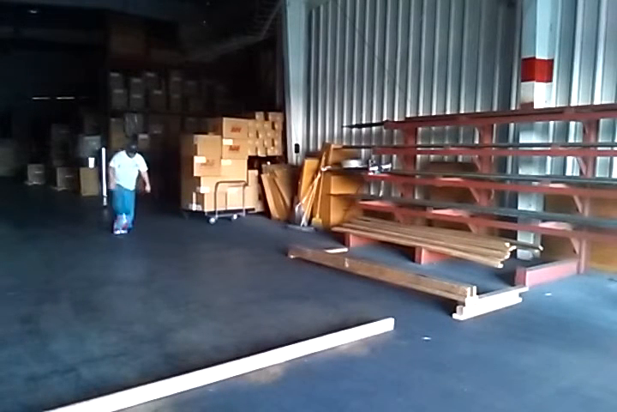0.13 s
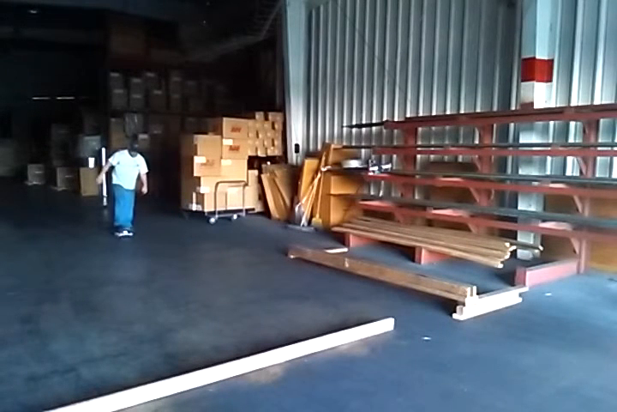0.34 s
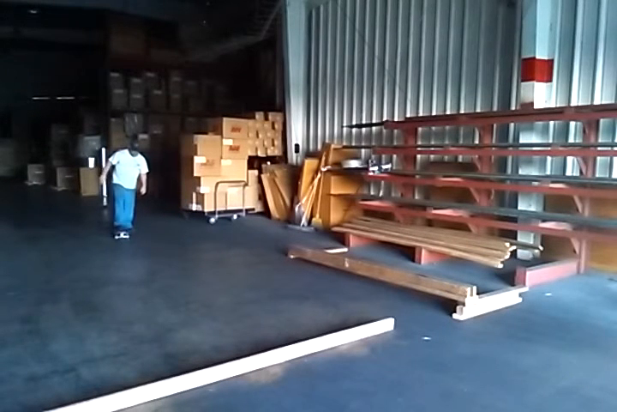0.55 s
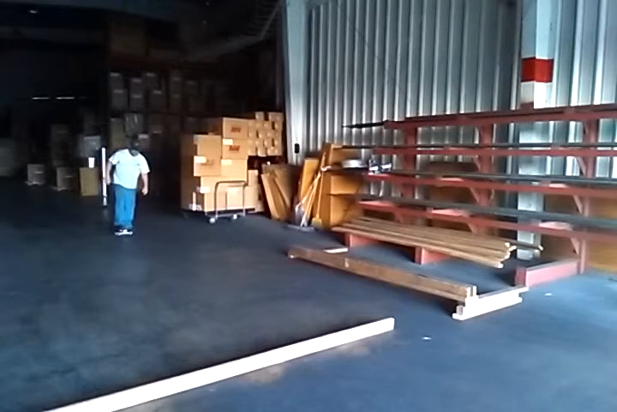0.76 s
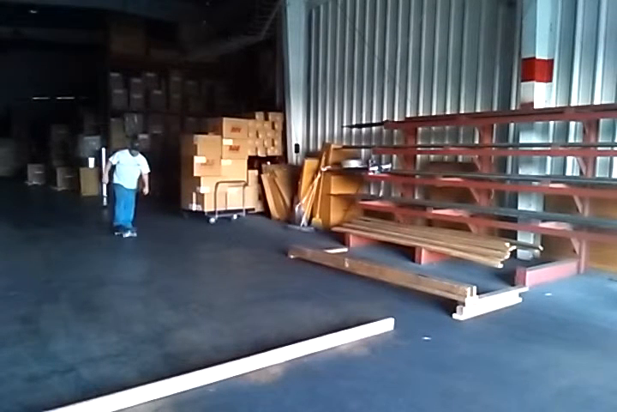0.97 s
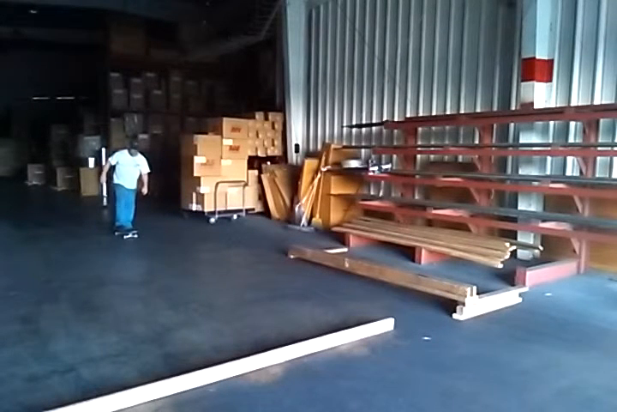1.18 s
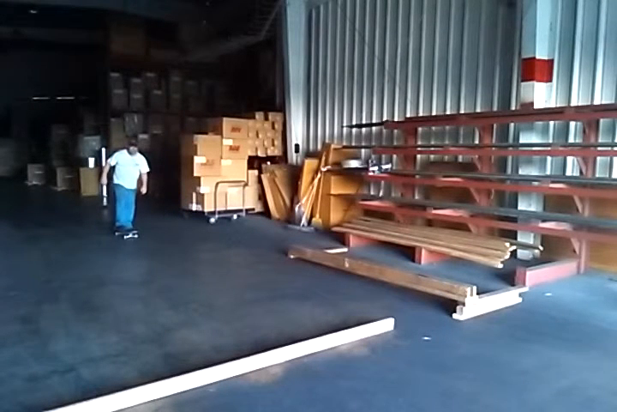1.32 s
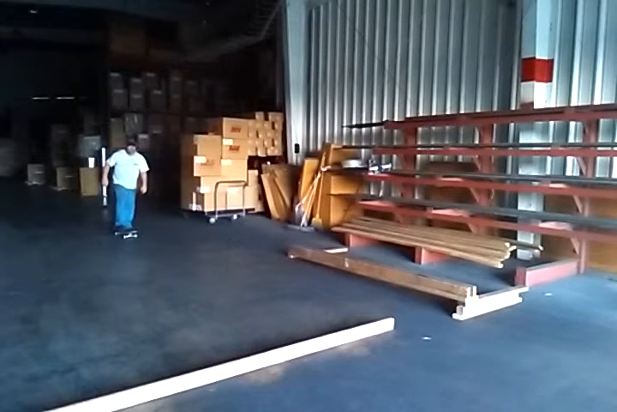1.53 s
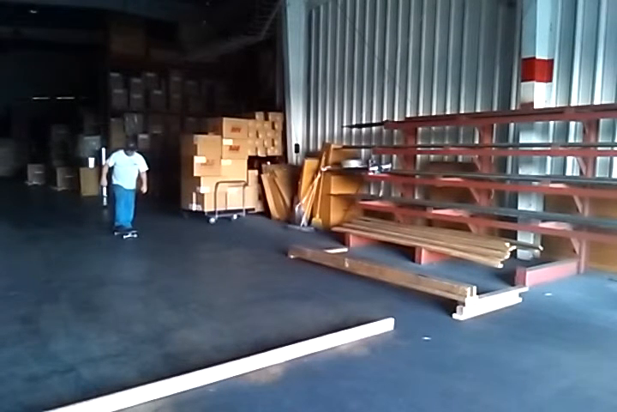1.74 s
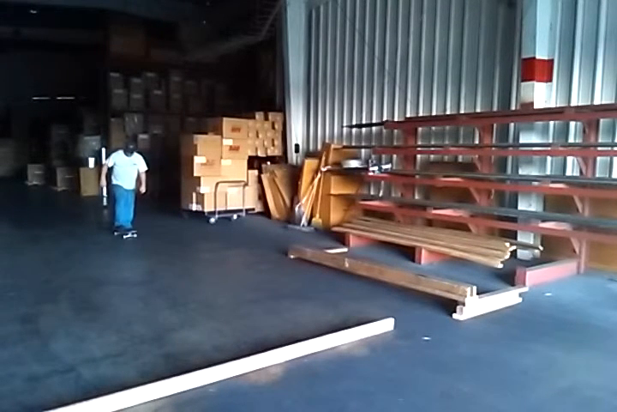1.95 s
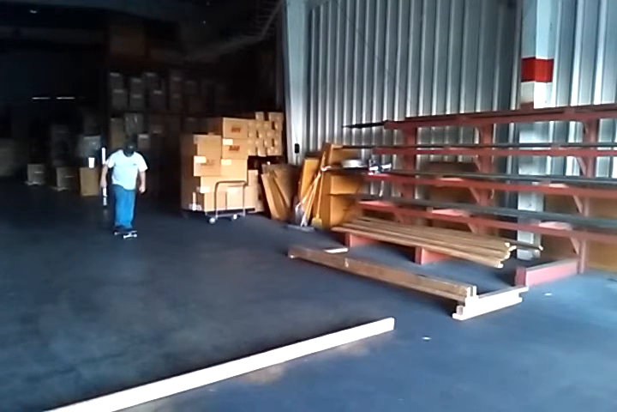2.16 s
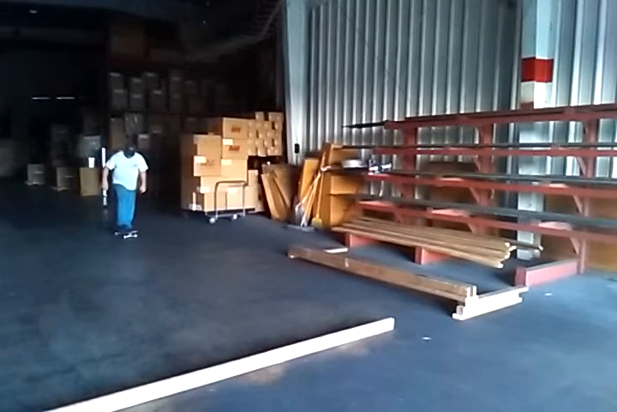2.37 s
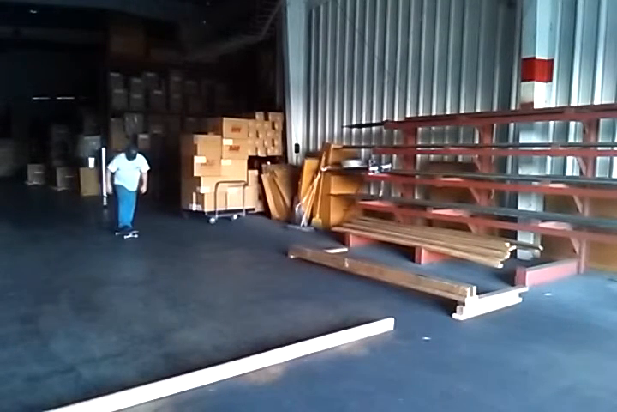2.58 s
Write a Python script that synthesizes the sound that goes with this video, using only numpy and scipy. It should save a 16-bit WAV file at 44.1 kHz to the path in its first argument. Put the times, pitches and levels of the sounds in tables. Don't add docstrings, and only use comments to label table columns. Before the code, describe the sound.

Hard skateboard clacks on a concrete floor come first, loud and close together, followed by weaker taps and barely audible rolling wheels; a large empty hall adds a long tail, with low air rumble and faint hiss.

```python
import sys
import numpy as np
from scipy import signal
from scipy.fft import rfft, irfft
from scipy.io import wavfile
from scipy.ndimage import uniform_filter1d

SR = 44100
rng = np.random.default_rng(int(sys.argv[2]) if len(sys.argv) > 2 else 0)


def transcribe(signal):
    frames = np.atleast_2d(signal).T
    limited = np.clip(frames, -1, 1)
    pcm = np.round(limited * 32767).astype(np.int16)
    wavfile.write(sys.argv[1], SR, pcm)


def ratio(d):
    e = np.asarray(d, float) / 20
    return 10 ** e


N = 114660


def evened(x):
    return x / np.sqrt(np.mean(x ** 2) + 1e-20)


def read(points, hz):
    f, value = np.transpose(points)
    return np.interp(np.log(hz + 1), np.log(f + 1), value)


def level(curve):
    s, db = np.transpose(curve)
    return ratio(uniform_filter1d(np.interp(np.arange(N) / SR, s, db), size=400))


def resonate(x, body):
    out = 0
    for hz, width, db in body:
        r = np.exp(-np.pi * width / SR)
        a = [1, -2 * r * np.cos(2 * np.pi * hz / SR), r * r]
        b = [(1 - r * r) / 2, 0, -(1 - r * r) / 2]
        once = signal.lfilter(b, a, x)
        out = out + ratio(db) * signal.lfilter(b, a, once)
    return out


def noise(field_db, count, patchy_db, size=512):
    frames, hz = count * 4 // size + 6, np.fft.rfftfreq(size, 1 / SR)
    s = np.arange(frames) * size / 4 / SR
    a, b, patches = rng.standard_normal((frames, len(hz), 3)).T
    patches = uniform_filter1d(patches, size=6, axis=0)
    patches = evened(uniform_filter1d(patches, size=8, axis=1))
    z = (a + 1j * b) * ratio(field_db(hz[:, None], s) + patchy_db * patches)
    return signal.istft(z, nperseg=size, noverlap=size * 3 // 4)[1][:count]


# (time [s], level [dB], hall send [dB])
TICKS = [(-.3, -27, -31), (0.2105, -12.5, -35.5), (0.215, -18, -41.5), (0.318, -6.5, -42.5),
         (0.3196, -10.5, -30.5), (.5325, -15, -34), (1.0614, -16, -32.5), (1.2003, -22.5, -38.5),
         (1.478, -47.5, -42), (1.4884, -40, -29), (2.254, -38, -35)]
# (time [s], level [dB], centre [Hz], width [octaves], hall send [dB])
KNOCKS = [(.2096, -14.5, 945, 1.17, -23.5), (.2110, -21, 410, .25, -17.5), (0.2137, -11.5, 1300, 0.23, -22),
          (.3190, -19.5, 760, .5, -21), (0.3219, -7.5, 1140, 0.46, -21), (.3430, -16, 693, 1.03, -14.5),
          (0.5341, -25, 1050, 1.08, -17), (0.557, -26, 498, 0.14, -14.5), (1.0635, -22.5, 850, 0.45, -17.5),
          (1.0850, -25.5, 583, 1.26, -9.5), (1.4790, -45, 1070, 0.22, -18.5),
          (1.5180, -44.5, 1800, 0.75, -21.5), (2.2540, -45.5, 1137, 0.97, -21.5),
          (2.2560, -48.5, 1650, 0.48, -12.5)]
# (delay [s], level [dB])
NEAR_ECHOES = [(.0024, -13.5), (.0052, -16), (.0085, -11.5), (0.012, -9.5)]


def board():
    near = np.zeros(1000)
    near[0] = 1
    for s, db in NEAR_ECHOES:
        near[round(s * SR)] = ratio(db)

    luck = rng.standard_normal((len(KNOCKS), len(DECK_MODES)))
    blows = [(s, *tick(*row)) for s, *row in TICKS]
    blows += [(s, *knock(*row, k)) for (s, *row), k in zip(KNOCKS, luck)]

    out = np.zeros(N + 3 * SR)
    for s, direct, tail in blows:
        start = SR + round(s * SR)
        for part in signal.fftconvolve(direct, near), tail:
            out[start:][:len(part)] += part
    return out[SR:SR + N]


# (frequency [Hz], level [dB])
TICK_COLOUR = [(500, -10.5), (2300, -11), (3200, -5), (3900, -11.5), (6000, -6.5), (7600, -2.5), (9000, -4),
               (11300, 3.5), (14000, -10.5)]
TICK_T60_S, TICK_RING_T60_S, TICK_RING_DB = 0.0016, 0.0067, -12.5
TICK_FLOOR_HZ, DIRECT_TILT_DB_PER_OCT = 1800, -1


def tick(db, send_db):
    t = np.arange(3000) / SR
    tilted = lambda hz, s: read(TICK_COLOUR, hz) + DIRECT_TILT_DB_PER_OCT * np.log2(hz + 1) + 0 * s
    grit = noise(tilted, len(t), 0)
    decay = ratio(-60 * t / TICK_T60_S) + ratio(TICK_RING_DB - 60 * t / TICK_RING_T60_S)
    crack = grit * decay * np.minimum(t / 0.00041, 1)
    crack = signal.lfilter(*signal.butter(2, TICK_FLOOR_HZ, "high", fs=SR), crack)
    tail = hall(lambda hz: db + send_db + read(TICK_COLOUR, hz))
    return ratio(db) * crack / abs(crack).max(), tail


# (frequency [Hz], level [dB], decay by 60 dB [s])
DECK_MODES = [(293, -0.5, 0.043), (415, -8, .05), (482, -3, 0.11), (621, -6.5, 0.08), (735, -0.5, 0.039),
              (940, -6.5, 0.021), (1057.4, -1, 0.061), (1134, -2.5, 0.038), (1310, -3, 0.022),
              (1470, -9, 0.038), (1603, -5.5, 0.045), (1937, -4, 0.042), (2254, -9.5, 0.038),
              (3010, -2.5, 0.036)]
SPREAD_DB = 1.2
SMEAR_HZ, SKIRT_HZ, SKIRT_DB = 27.3, 159.6, -9


def knock(level_db, bright_hz, octaves, send_db, luck):
    t = np.arange(6000) / SR
    hz, db, t60 = np.transpose(DECK_MODES)[:, :, None]
    db = db - 6 * (np.log2(hz / bright_hz) / octaves) ** 2 + SPREAD_DB * luck[:, None]
    modes = ratio(db - 60 * t / t60) * np.sin(2 * np.pi * hz * t + luck[::-1, None])
    deck = modes.sum(0) * np.minimum(t / 0.00047, 1)

    def spread(f):
        peak = 1 / (1 + ((f - hz.T) / SMEAR_HZ) ** 2)
        skirt = ratio(SKIRT_DB) / (1 + ((f - hz.T) / SKIRT_HZ) ** 2)
        return (ratio(2 * (db - db.max())).T * (peak + skirt)).sum(1)

    tail = hall(lambda f: level_db + send_db + 10 * np.log10(spread(f)))
    return ratio(level_db) * deck / abs(deck).max(), tail


# (frequency [Hz], decay by 60 dB [s])
HALL_T60 = [(150, 0.43), (400, 0.58), (1000, 0.73), (2000, 1.028), (4000, 1.053), (8000, 0.76),
            (13000, 0.54)]
# (frequency [Hz], level [dB])
HALL_COLOUR = [(150, -4), (400, -1), (1000, -8.5), (2200, -2), (2600, -5), (3300, -6), (4000, -5),
               (13000, -8.5)]
BASS_GAP_DB_PER_OCT = 3.5
WALL_S, WALL_RISE_S, HOLD_S, PATCHY_DB = 0.014, 0.0021, 0.054, 2.5


def hall(source_db):
    t = np.arange(65536) / SR

    def field_db(hz, s):
        gap = BASS_GAP_DB_PER_OCT * np.log2(np.clip(hz, 100, 1500) / 1500)
        gap = gap / (1 + np.exp((s - WALL_S) / WALL_RISE_S))
        decay = -60 * (np.hypot(s, HOLD_S) - HOLD_S) / read(HALL_T60, hz)
        return read(HALL_COLOUR, hz) + gap + decay

    tail = noise(field_db, len(t), PATCHY_DB)
    hz = np.fft.rfftfreq(len(t), 1 / SR)[:, None]
    tail = irfft(rfft(tail) * ratio(source_db(hz).ravel()))
    return tail * np.minimum(t / 0.0021, 1) * np.minimum((t[-1] - t) / 0.11, 1)


# (time [s], level [dB])
ROLL = [(0., -66), (.12, -74), (.2, -72), (.3, -62), (.8, -75), (1.05, -69), (1.7, -67.5), (2.0, -76.5),
        (2.3, -75.5), (2.6, -66.5)]
# (frequency [Hz], width [Hz], level [dB])
ROLL_BODY = [(470, 210, 2.5), (780, 150, 8), (1300, 300, 7), (2400, 2700, -0.5), (3200, 500, -15.5)]
GRIT_PER_S, GRIT_DB = 7500, 3.5


def rolling():
    hits = rng.standard_normal(N) * (rng.random(N) < GRIT_PER_S / SR)
    grit = hits * ratio(GRIT_DB * np.minimum(rng.exponential(1, N), 3))
    blur = rng.standard_normal(3000) * ratio(-60 * np.arange(3000) / SR / 0.12)
    distant = signal.fftconvolve(grit, blur)[:N]
    return level(ROLL) * evened(resonate(distant, ROLL_BODY))


def squeak():
    start_s, end_s, low_hz, high_hz = 0.14, 0.21, 2500, 3600
    u = np.clip((np.arange(N) / SR - start_s) / (end_s - start_s), 0, 1)
    turns = np.cumsum(low_hz + (high_hz - low_hz) * u) / SR
    rub = evened(uniform_filter1d(rng.standard_normal(N), round(0.002 * SR)))
    return ratio(-60) * u * (u < 1) * rub * np.sin(2 * np.pi * turns)


# (time [s], peak level [dB], pitch [Hz])
PUFFS = [(.048, -38.5, 59), (0.063, -35, 74), (.137, -39, 86), (0.523, -35, 69.4), (0.941, -37.5, 57.4),
         (1.038, -44, 110), (1.418, -41, 49.7), (1.54, -37.5, 58.4), (1.566, -47, 78)]


def puffs():
    s, db, hz = np.transpose(PUFFS)[:, :, None]
    u = np.pi * hz * (np.arange(N) / SR - s)
    return (ratio(db) * (1 - 2 * u ** 2) * np.exp(-u ** 2)).sum(0)


# (frequency [Hz], level [dB per Hz])
HISS_COLOUR = [(120, -11), (200, -10), (532, -19), (591, -15.5), (815, -16.5), (2020, -29.5), (2830, -27.5),
               (4330, -37.5), (14000, -30.5)]
# (frequency [Hz], level [dB per Hz])
DRAUGHT_COLOUR = [(8.8, -39.5), (15, -2), (64, -5), (80, -21), (130, -10.5), (184, -19.5), (300, -31.5),
                  (390, -58), (660, -120)]
# (time [s], level [dB])
DRAUGHT = [(0.0, -58), (0.06, -42.5), (0.1, -55), (0.13, -46.5), (0.29, -53), (0.39, -48), (0.47, -96),
           (0.52, -40.5), (0.59, -56.5), (0.71, -48), (0.79, -54), (0.96, -46), (0.99, -51.5), (1.3, -47.5),
           (1.33, -55), (1.4, -52.5), (2.19, -53.5), (2.6, -52)]
HISS_DB, LUMP_S, EVEN = -62, 0.047, 0.38


def air():
    hiss = evened(noise(lambda hz, s: read(HISS_COLOUR, hz) + 0 * s, N, 1.5))
    rumble = evened(noise(lambda hz, s: read(DRAUGHT_COLOUR, hz) + 0 * s, N, 0, size=4096))
    lumps = uniform_filter1d(rumble ** 2, round(LUMP_S * SR))
    lumps = uniform_filter1d(lumps, round(LUMP_S * SR))
    draught = evened(rumble / (abs(lumps) + 0.05) ** (EVEN / 2))
    return ratio(HISS_DB) * hiss + level(DRAUGHT) * draught


def scene():
    return np.tile(board() + rolling() + squeak() + puffs() + air(), (2, 1))


EDGE_HZ = 14330
# (frequency [Hz], share of bands [0-1])
FILLED = [(4600, 0.04), (5600, 0), (7000, .4), (9000, 0.6), (11500, 0.7), (14000, 0.8)]


def fill_treble(x):
    hz, s, z = signal.stft(x, SR, nperseg=2048, noverlap=1024, window=("cosine",))
    band = np.minimum(np.arange(len(hz)) // 32, 31)
    power = np.add.reduceat(abs(z[0]) ** 2, np.arange(32) * 32, axis=0) / 32

    treble = uniform_filter1d(np.diff(x[0], prepend=0) ** 2, size=256)[::256]
    before = np.maximum(treble[:-1], np.roll(treble, 1)[:-1])
    jump = uniform_filter1d((treble[1:] > 4 * before) * 1.0, size=9)
    steady = np.interp(s, np.arange(len(jump)) * 256 / SR, jump) == 0

    luck = uniform_filter1d(rng.standard_normal((len(s), 32)), size=3, axis=0).T
    rank = luck.ravel().argsort().argsort().reshape(luck.shape) / luck.size
    chosen = rank[band] < read(FILLED, hz)[band * 32 + 16, None]
    swap = chosen & steady & (hz[:, None] < EDGE_HZ) & (hz[:, None] > 4300)

    a, b = rng.standard_normal((len(s), len(hz), 2, 2)).T
    filled = np.where(swap, (a + 1j * b) * np.sqrt(power[band]), z)
    return signal.istft(filled, SR, nperseg=2048, noverlap=1024, window=("cosine",))[1][:, :N]


# (frequency [Hz], width [Hz], level [dB])
MIC_PEAK = [(3106, 540, -11)]


def microphone(x):
    band_limit = signal.firwin(511, EDGE_HZ, window=("kaiser", 9), fs=SR)
    return signal.oaconvolve(x + resonate(x, MIC_PEAK), band_limit[None], "same")


def low_pass(x):
    return signal.sosfilt(signal.butter(12, 14860, fs=SR, output="sos"), x)


def record(dry):
    mix = fill_treble(microphone(dry))
    return low_pass(mix)


dry = scene()
out = record(dry)
transcribe(out)
```